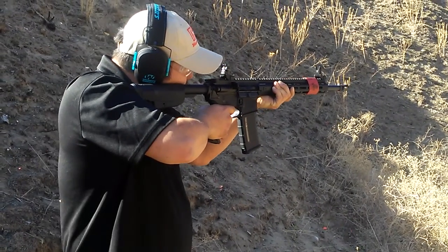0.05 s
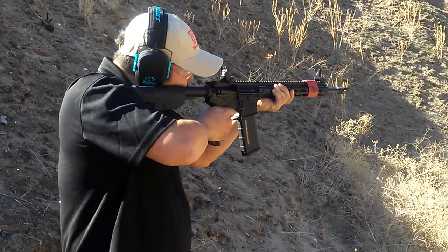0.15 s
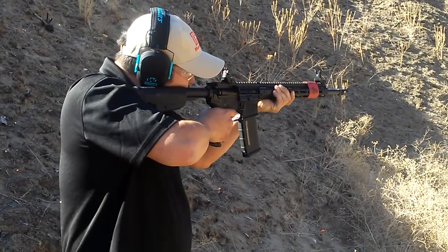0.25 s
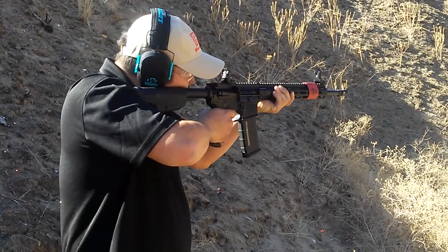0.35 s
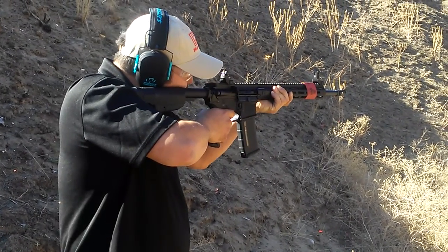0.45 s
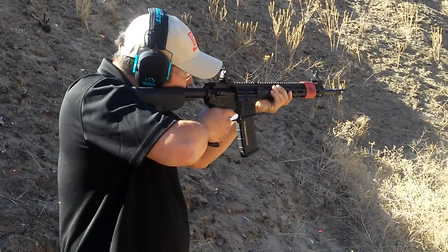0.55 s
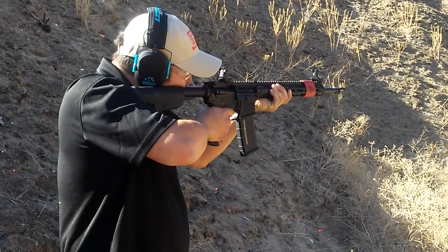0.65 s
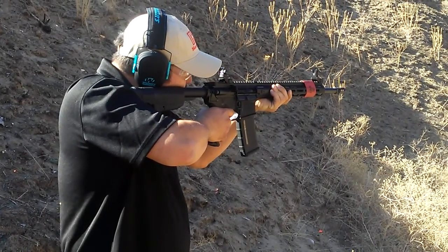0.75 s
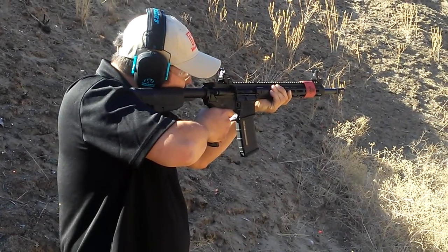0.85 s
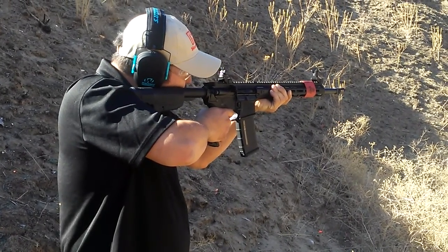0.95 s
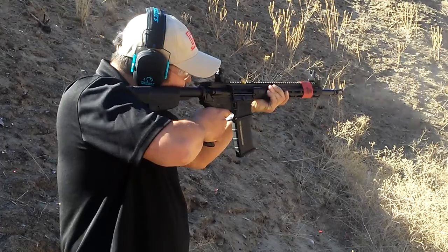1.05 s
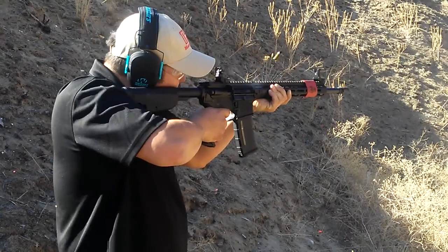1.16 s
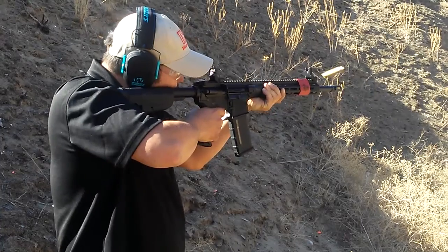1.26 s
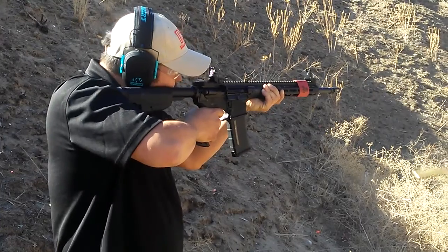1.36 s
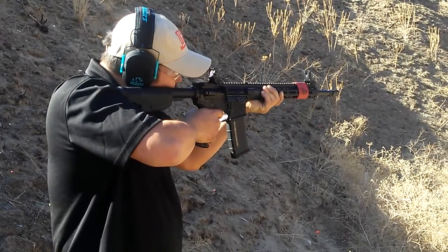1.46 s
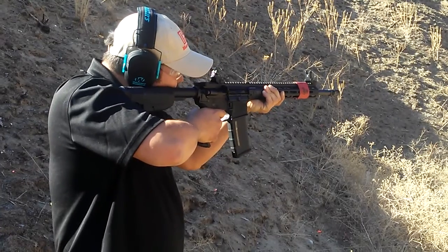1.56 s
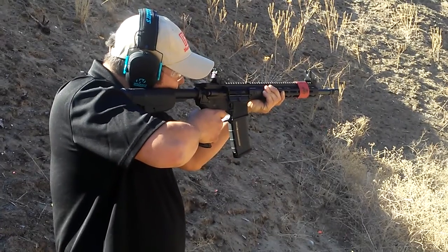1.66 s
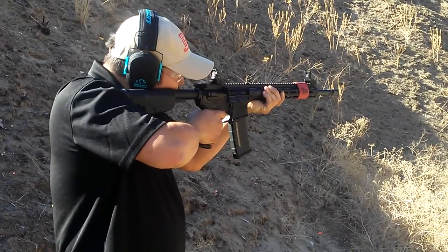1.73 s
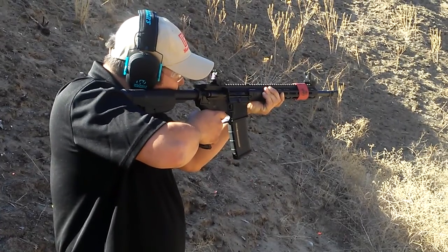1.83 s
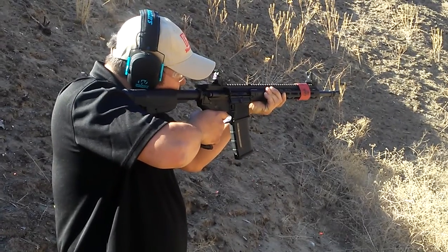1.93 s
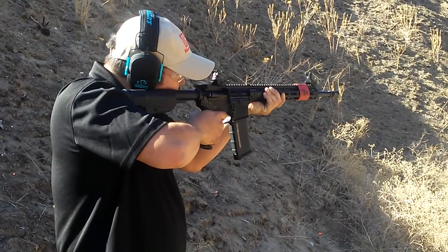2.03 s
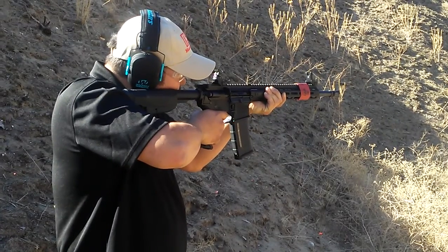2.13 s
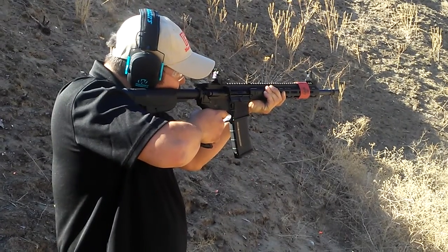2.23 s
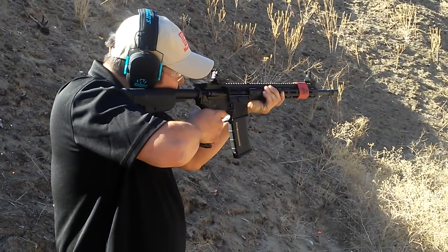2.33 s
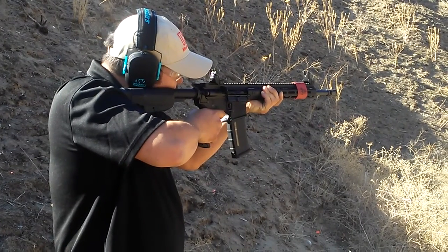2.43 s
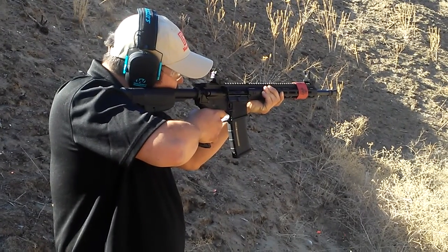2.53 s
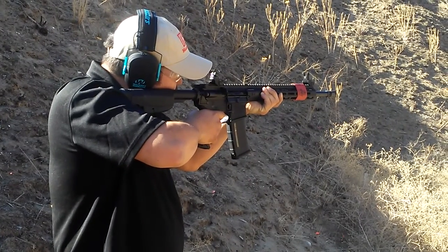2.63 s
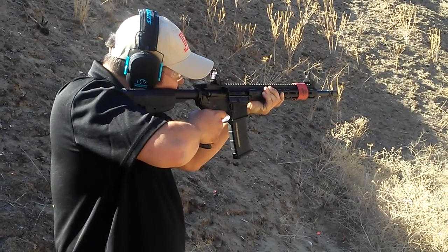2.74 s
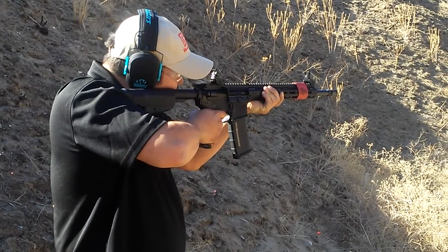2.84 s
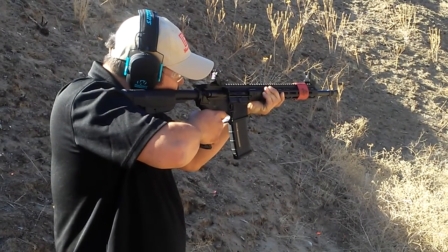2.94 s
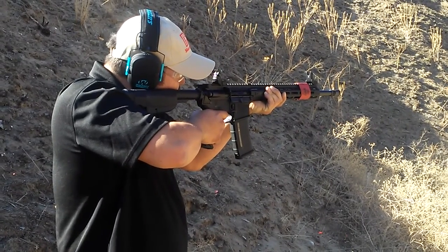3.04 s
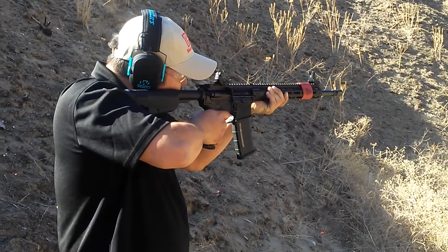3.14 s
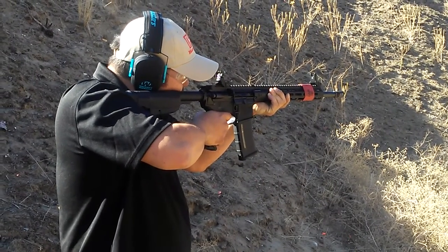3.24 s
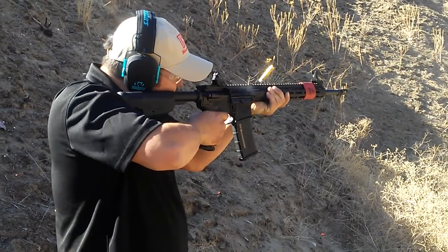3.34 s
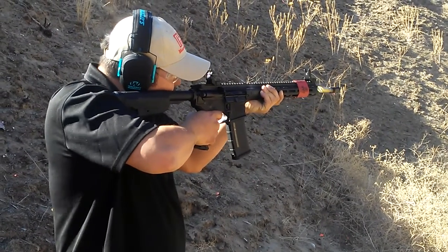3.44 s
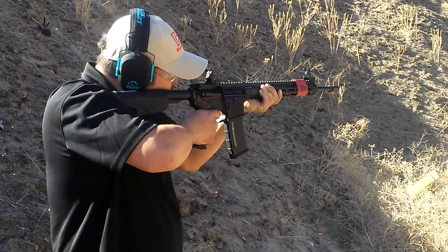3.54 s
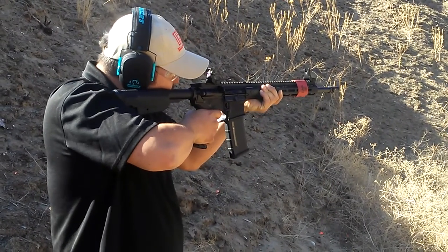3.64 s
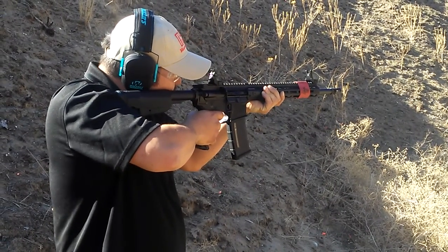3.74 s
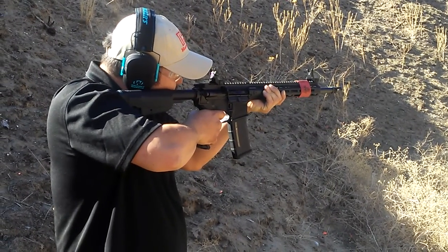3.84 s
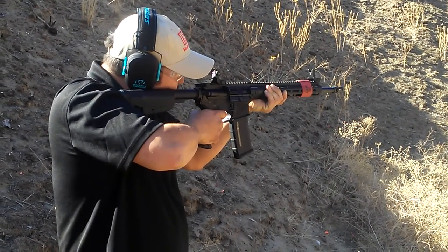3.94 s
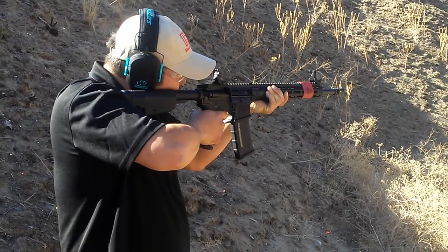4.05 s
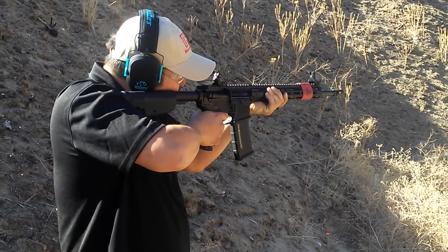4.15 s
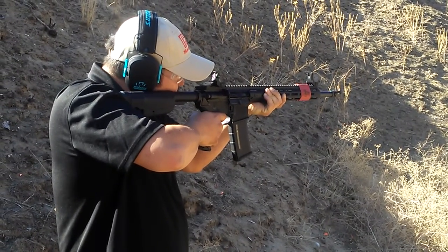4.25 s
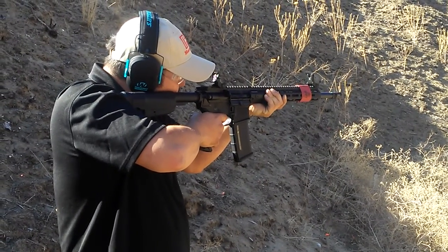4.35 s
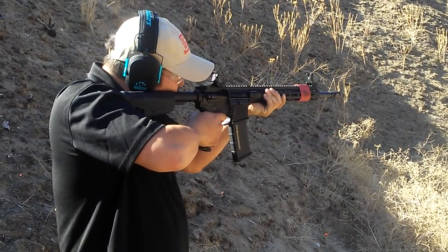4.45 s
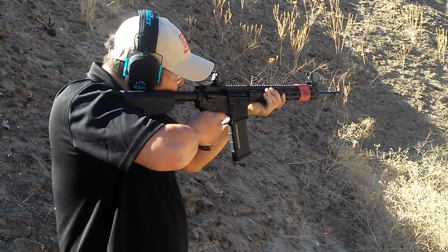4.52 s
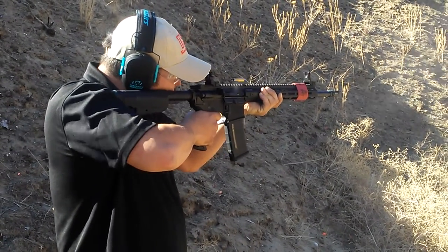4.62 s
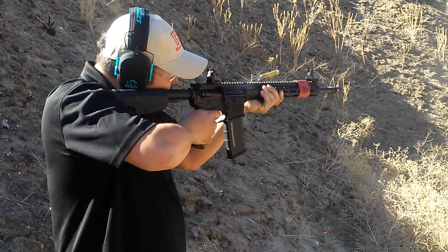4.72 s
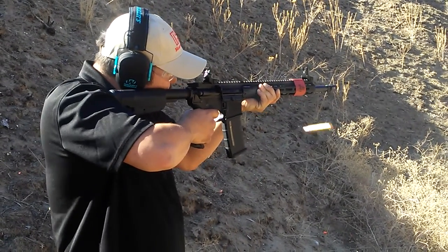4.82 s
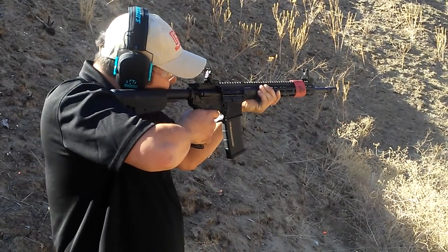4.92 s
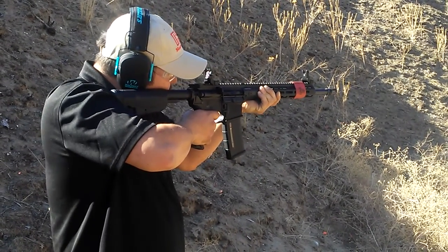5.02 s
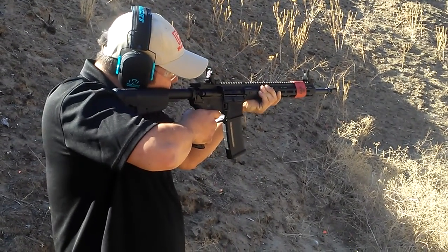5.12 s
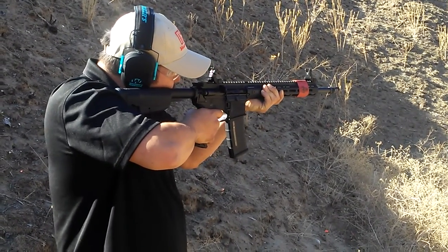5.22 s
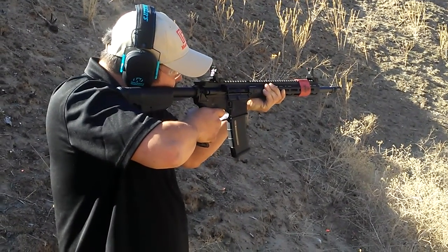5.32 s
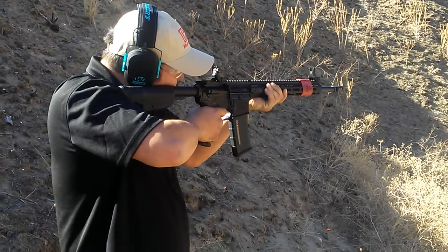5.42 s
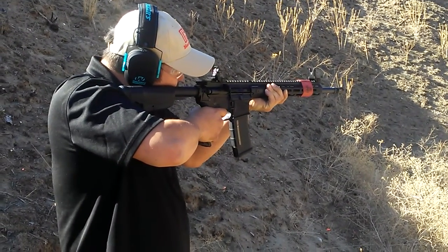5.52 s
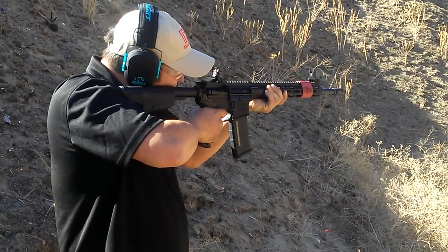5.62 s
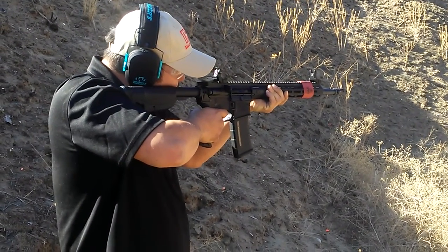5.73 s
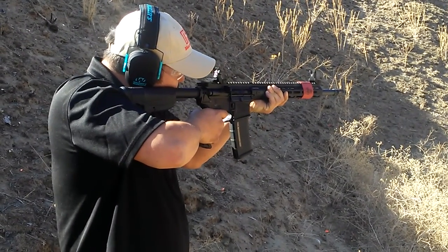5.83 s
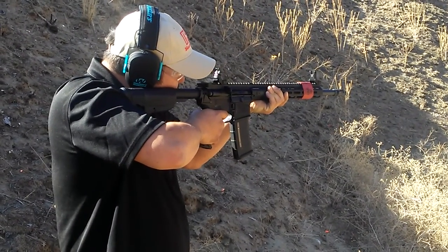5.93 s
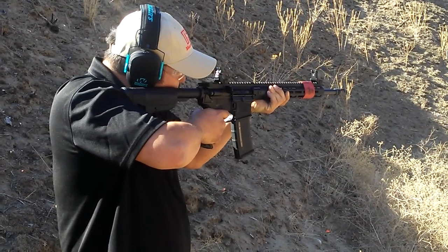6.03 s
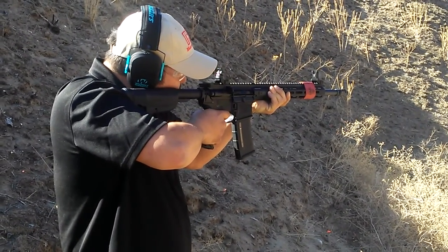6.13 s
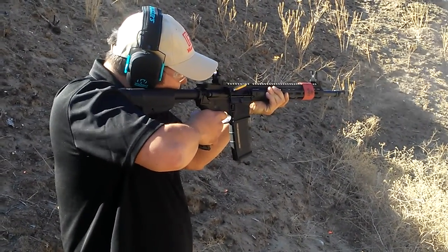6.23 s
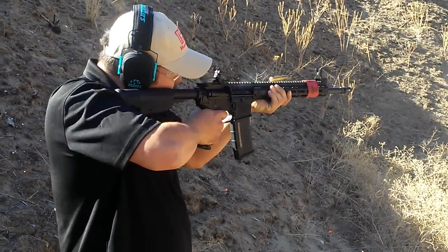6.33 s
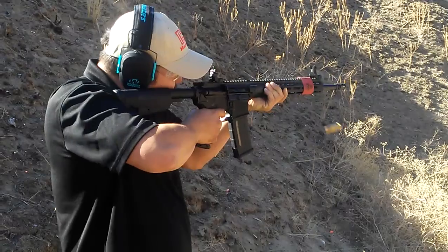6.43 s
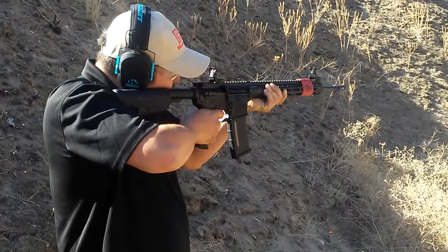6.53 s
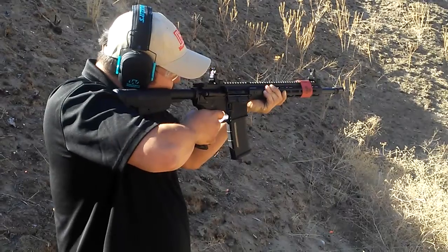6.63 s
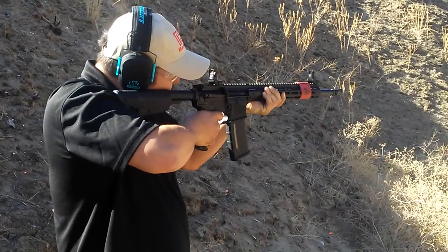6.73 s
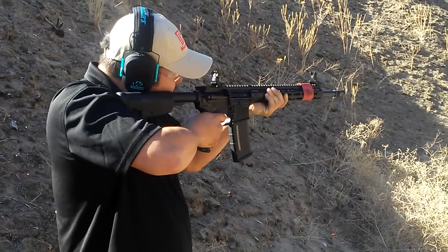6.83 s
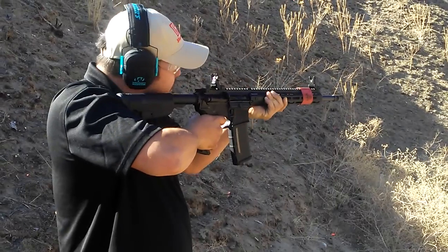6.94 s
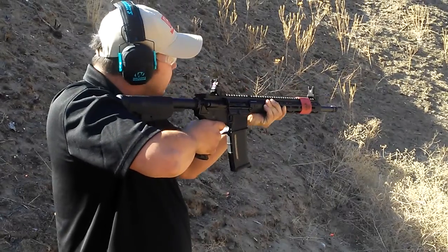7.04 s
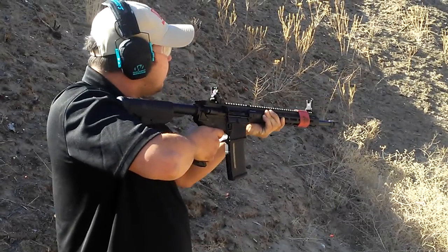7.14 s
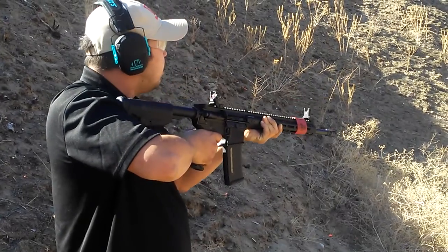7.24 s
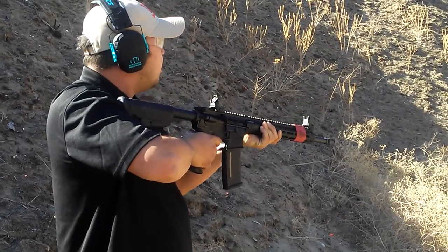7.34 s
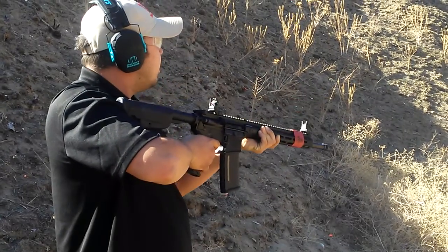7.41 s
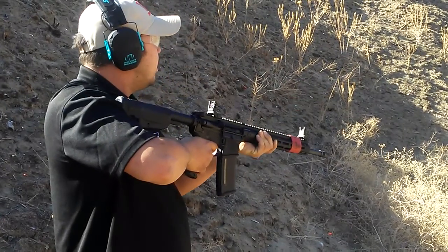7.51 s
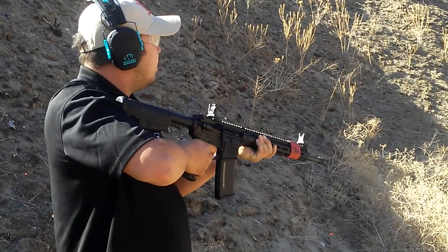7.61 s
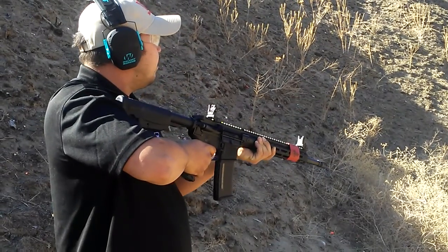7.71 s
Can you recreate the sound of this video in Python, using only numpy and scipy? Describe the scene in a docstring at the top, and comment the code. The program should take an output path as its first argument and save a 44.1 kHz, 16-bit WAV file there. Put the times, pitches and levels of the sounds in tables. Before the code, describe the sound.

A semi-automatic rifle fires four single shots close to the microphone on an outdoor range, about one and a half to two seconds apart. Each sharp, slightly overloaded blast rolls off earth banks and returns faintly from distant hills. Spent brass cases tick and ring softly after the first two shots, wind briefly bumps the microphone, and the trigger clicks. A sleeve brushes faintly against the rifle at the end.

```python
"""On an outdoor range, a semi-automatic rifle fires four single shots close to the microphone.
Each blast overloads the input, rolls round the earth banks with nearly the same echoes every time,
and comes back from far hills a second later. The trigger resets, spent brass cases land and ring,
gusts bump the microphone and a sleeve brushes the rifle. A soft gate turns down the pauses."""
import sys
import numpy as np
from scipy import signal
from scipy.fft import rfft, irfft, next_fast_len
from scipy.io import wavfile
from scipy.ndimage import uniform_filter1d, map_coordinates

SR = 44100
rng = np.random.default_rng(int(sys.argv[2]) if len(sys.argv) > 2 else 0)


def digitize_waveform(pressure):
    """Quantize a signal to 16-bit integers and store it at the path in sys.argv[1].

    Rows of a 2-D input are taken as channels; values are limited to [-1, 1].
    """
    field = np.atleast_2d(pressure).T
    bounded = np.clip(field, -1, 1)
    quanta = np.round(bounded * 32767).astype(np.int16)
    wavfile.write(sys.argv[1], SR, quanta)


N = 342651
NOW = np.arange(N) / SR  # seconds since the scene began
AGE = np.arange(int(1.2 * SR)) / SR  # seconds since a shot
BRIEF = AGE[:SR // 4]  # the same clock for short sounds

# the shots: (time [s], blast level [dB], gas push [dB], lead-in crack [dB], echo from the hills [dB])
SHOTS = [(1.1135, -0.5, 2, -23.5, -40), (3.3336, -0.5, -2.5, -23, -39), (4.6526, 0, -5.5, -13, -39.5),
         (6.2743, 0.5, -5.5, -14, -39)]


def amp(db):
    """Turn decibels into a factor to multiply by."""
    return 10 ** (np.asarray(db) / 20)


def unit(x):
    """Scale a signal to an average strength (rms) of 1."""
    return x / np.sqrt(np.mean(x ** 2) + 1e-20)


def colour(points):
    """A tone curve drawn through points of (frequency [Hz], relative level [dB])."""
    point_hz, db = np.transpose(points)
    return lambda hz: amp(np.interp(np.log(hz + 1), np.log(point_hz), db))


def band(centre_hz, q):
    """A tone curve with one broad hump; a higher q makes it narrower."""
    return lambda hz: 1 / np.sqrt(1 + (q * (hz / centre_hz - centre_hz / (hz + 1))) ** 2)


def filtered(x, curve):
    """Shape a sound with a tone curve."""
    n = x.shape[-1]
    padded = next_fast_len(n + 8192)
    return irfft(rfft(x, padded) * curve(np.fft.rfftfreq(padded, 1 / SR)), padded)[..., :n]


def noise(curve, size):
    """Noise of strength 1, shaped by a tone curve."""
    return unit(filtered(rng.standard_normal(size), curve))


def wobble(clock, per_s):
    """A smooth curve through per_s random values a second."""
    return map_coordinates(rng.standard_normal(SR // 10), [clock * per_s])


def add(track, s, sound):
    """Mix a sound into the track, starting at s seconds."""
    part = track[round(s * SR):][:len(sound)]
    part += sound[:len(part)]


def envelope(db, rise_s, sag_db_per_s, hold_s, drop_db_per_s):
    """Loudness after a shot: it rises, sags steadily, and drops faster once the hold is over."""
    rise = 1 - np.exp(-AGE / rise_s)
    return rise * amp(db - sag_db_per_s * AGE - drop_db_per_s * np.maximum(AGE - hold_s, 0))


def scatter(curve, change):
    """One row of noise per shot: the ground stays put, so all share a pattern, plus some change."""
    shared = rng.standard_normal(len(AGE))
    fresh = rng.standard_normal((len(SHOTS), len(AGE)))
    return unit(filtered(shared + change * fresh, curve))


def distance():
    """Far hills send back each shot as a dull wash and boom, over rumbling air and a faint hiss."""
    # tone of the wash from the hills: (frequency [Hz], relative level [dB])
    wash_tone = [(40, -37), (120, -14.5), (230, 0), (350, 2.5), (490, -1), (690, 4.5), (880, -7),
                 (1250, -1.5), (1500, -7.5), (1850, -8), (2300, -14.5), (2900, -32), (4300, -34.5),
                 (9000, -57.5)]
    # tone of their boom and of the air: (frequency [Hz], relative level [dB])
    rumble_tone = [(10, -34.5), (30, -17), (52, 3), (100, -8), (200, -18), (400, -34), (3000, -82.5)]
    hiss_tone = [(100, -2.2), (1000, 0.35), (4000, 3), (7000, -2.0), (15000, -0.5)]
    earlier_shot = (-1.437, -42.5)  # fired before the scene opens: (time [s], echo level [dB])
    full_at_s, fade_from_s = 1.133, 1.273
    swell_db_per_s, fade_db_per_s = 29, 43.5
    echo = np.zeros(N)
    for s, *_, hills_db in [earlier_shot] + SHOTS:
        age = NOW - s
        swell_db = swell_db_per_s * np.minimum(age - full_at_s, 0)
        fade_db = fade_db_per_s * np.maximum(age - fade_from_s, 0)
        echo += (age > 0) * amp(hills_db + swell_db - fade_db)
    wash = noise(colour(wash_tone), N)
    boom = amp(-11.5) * noise(colour(rumble_tone), N)
    hiss = amp(-66) * noise(colour(hiss_tone), N)
    rumble = amp(-59.5 + 0.5 * wobble(NOW, per_s=7.2)) * noise(colour(rumble_tone), N)
    return echo * (wash + boom) + rumble + hiss


def wind():
    """Gusts shed ever weaker, slower swirls; each rocks the microphone about once and stirs the air."""
    # gusts on the microphone: (time [s], length [s], level [dB], swirl pitch [Hz])
    gusts = [(.19, .02, -41, 64.6), (0.226, .09, -39.5, 61), (0.683, .02, -47, 70), (2.183, .02, -32, 71),
             (2.253, .2, -12, 115), (2.495, .02, -30.5, 109), (2.725, .09, -27, 85.5),
             (2.841, .05, -43, 65), (2.993, 0.16, -29.5, 100), (3.321, .02, -34.5, 89.4),
             (5.627, .05, -29, 62), (6.259, .02, -30, 85.6)]
    stir_tone = [(15, -34), (50, 22.5), (130, -1), (230, -3.0), (400, -9.5), (1000, -62), (3000, -100)]
    gap_s, jitter_s, lead_s = 0.035, 0.004, 0.1  # lead_s leaves room for a swirl to build up
    fade_db_per_s, slowing_octaves_per_s, spread_octaves = 42, 2.6, 0.25
    bumps, stir = np.zeros(N), np.zeros(N)
    for (s, length, db, hz), chance in zip(gusts, rng.standard_normal((len(gusts), 20, 2))):
        for age, (late, sharp) in zip(np.arange(0, length, gap_s), chance):
            start = s + age + jitter_s * late - lead_s
            size = amp(db - fade_db_per_s * age)
            octaves = spread_octaves * sharp - slowing_octaves_per_s * age
            cycles = (BRIEF - lead_s) * hz * 2 ** octaves
            add(bumps, start, size * np.sin(2 * np.pi * cycles) * np.exp(-(cycles / 0.68) ** 2))
            add(stir, start, size * np.exp(-(cycles / 3.0) ** 2))
    return bumps + amp(-16) * stir * noise(colour(stir_tone), N)


def sleeve():
    """A sleeve hisses softly as it slides over the stock while the rifle is lowered."""
    # strokes of the sleeve: (time [s], level [dB], half length [s])
    swishes = [(7.134, -41.5, 0.045), (7.292, -41.5, 0.12), (7.44, -47.5, 0.069)]
    # tone of rubbing cloth: (frequency [Hz], relative level [dB])
    cloth_tone = [(200, -29), (700, 14.5), (1500, 15.5), (2200, 12), (2900, -7.5), (4000, -4.5),
                  (5200, -17), (7000, -34), (12000, -40)]
    slide = sum(amp(db) * np.exp(-((NOW - s) / half_s) ** 2) for s, db, half_s in swishes)
    return slide * noise(colour(cloth_tone), N)


def cases():
    """Spent brass cases tick on the stones and ring very high."""
    # cases touching down: (time [s], tick level [dB], ring level [dB])
    landings = [(1.831, -48, -74), (1.859, -40, -61), (1.873, -38, -51), (1.881, -42, -77),
                (4.033, -45.5, -56), (4.199, -36.5, -61), (4.213, -38, -66)]
    # notes of a case: (pitch [Hz], relative level [dB], time to fade by 60 dB [s])
    brass_notes = [(12480, 1, .13), (15670, -3, .18)]
    stone_tone = [(200, -24), (2000, 9.5), (3800, 2), (6500, -2), (9000, -27), (15000, -18)]
    out = np.zeros(N)
    for s, tick_db, ring_db in landings:
        ring = sum(amp(db + rng.normal(0, 1.8) - 60 * BRIEF / fade_s) * np.sin(2 * np.pi * hz * BRIEF)
                   for hz, db, fade_s in brass_notes)
        tick = amp(-60 * BRIEF / 0.043) * noise(colour(stone_tone), len(BRIEF))
        add(out, s, amp(tick_db) * tick + amp(ring_db) * ring)
    return out


def knocks():
    """Each knock is a quickly fading thud under a short click, both softened by the air on their way."""
    # the trigger resetting, things hitting the ground and knocks on the microphone:
    # (time [s], thud level [dB], thud pitch [Hz], time for the thud to fade by 60 dB [s], click [dB])
    hits = [(1.834, -19, 263, 0.043, -32.5), (2.251, -6, 210, 0.022, -48), (3.675, -1.5, 855, 0.016, -18),
            (4.032, -25.5, 305, 0.059, -38.5), (4.198, -23, 1080, 0.04, -25), (4.213, -39, 1500, .025, -22),
            (4.229, -44, 1000, .03, -31.5), (5.338, -18.5, 253, 0.035, -40),
            (6.6351, -6, 1190, 0.0069, -10), (6.946, -5, 266, 0.011, -29.5),
            (7.251, -27.5, 270, 0.037, -52)]
    click_tone = [(40, -31), (150, 11), (1100, 10.5), (2000, 6.0), (2800, -1), (4000, -9.0),
                  (7000, -36), (15000, -41)]
    out = np.zeros(N)
    for s, db, hz, fade_s, click_db in hits:
        rise = 1 - np.exp(-3 * hz * BRIEF)
        thud = rise * amp(db - 60 * BRIEF / fade_s) * np.sin(2 * np.pi * hz * BRIEF)
        click = amp(click_db - 60 * BRIEF / 0.037) * noise(colour(click_tone), len(BRIEF))
        add(out, s, thud + click)
    return filtered(out, lambda hz: 1 / (1 + (hz / 6000) ** 4))


def burst(curve, rise_s, decay_s):
    """A very short burst of noise."""
    return noise(curve, len(BRIEF)) * (1 - np.exp(-BRIEF / rise_s)) * np.exp(-BRIEF / decay_s)


def lead_in_and_bolt():
    """A short, faint crack leads into each blast; then the bolt slams shut and its spring sizzles."""
    # tone of the recoil spring: (frequency [Hz], relative level [dB])
    spring_tone = [(3000, -30), (6500, 4), (8800, 7), (11500, -7), (13700, -7), (16000, -11)]
    lead_in_tone = [(40, -33.0), (200, -7), (1200, -4.0), (2300, 1.0), (3500, -5), (5200, -5.5),
                    (7500, -26.0), (15000, -32.5)]
    spring_db, spring_fade_s = -46.5, 0.47
    out = np.zeros(N)
    for s, _, _, lead_in_db, _ in SHOTS:
        lead_in = burst(colour(lead_in_tone), rise_s=0.001, decay_s=0.003)
        bolt = burst(band(4800, q=1.3), rise_s=0.0005, decay_s=0.0036)
        spring = noise(colour(spring_tone), len(AGE)) * amp(spring_db - 60 * AGE / spring_fade_s)
        add(out, s - 0.0075, amp(lead_in_db) * lead_in)
        add(out, s + 0.083, amp(-13) * bolt)
        add(out, s + 0.15, spring)
    return out


def slaps():
    """Separate echoes of each shot: air and soft soil swallow the treble; the deepest bass is lost."""
    # echoes round the range: (delay [s], level [dB], rise [s], decay [s], centre pitch [Hz])
    echoes = [(.02, -2.5, 0.0066, 0.0092, 130), (.058, -7.5, 0.0017, .012, 1462),
              (0.102, -9, .02, .02, 795), (0.162, -13.5, 0.0038, 0.03, 102.2),
              (0.197, -15.5, 0.012, 0.025, 106), (0.207, -15, 0.00074, 0.037, 1100),
              (.255, -21, 0.0048, 0.13, 1420), (0.347, -17.5, 0.003, 0.022, 393),
              (.402, -14, .0005, 0.0084, 1100), (.478, -18.5, 0.0023, 0.024, 790),
              (0.57, -20, 0.011, 0.025, 360), (.69, -37, 0.0082, 0.052, 254)]
    out = np.zeros((len(SHOTS), len(AGE)))
    for delay, db, rise, decay, centre_hz in echoes:
        def dulled(hz):
            treble_loss = (1 + (hz / (4 * centre_hz)) ** 2) * (1 + (hz / 2500) ** 8)
            bass_loss = 1 + (58 / (hz + 1)) ** 4
            return band(centre_hz, q=0.9)(hz) / (treble_loss * bass_loss)
        swell = np.exp(-np.maximum((delay - AGE) / rise, (AGE - delay) / decay))
        out += amp(db) * swell * scatter(dulled, change=0.17)
    return out


def lumps(per_s, depth_db):
    """A random flutter in loudness: rocks and gullies throw sound back in clumps."""
    return unit(amp(depth_db * wobble(AGE, per_s)))


def banks():
    """The roll of each shot: a low boom and a fuller body off the earth, a sizzle off dry brush."""
    # tones of the boom, the body and the brush, each: (frequency [Hz], relative level [dB])
    boom_tone = [(12, -58.5), (30, -24.5), (48, -13.5), (85, -6.5), (130, -5), (190, -3), (280, -4),
                 (450, -27), (900, -70), (3000, -120)]
    body_tone = [(30, -59.5), (100, -32.5), (190, -9.5), (300, -2), (400, -2), (500, -3), (660, 0.5),
                 (900, -5.5), (1100, -8.5), (1350, -6), (2100, -11), (2550, -19), (3500, -25),
                 (7000, -74.5)]
    brush_tone = [(300, -52.5), (1200, -34), (2300, -7.5), (2900, -0.5), (4000, 2.5), (5000, -3),
                  (6000, -15), (7300, -36.5), (8800, -39), (11000, -44), (13500, -42.5), (16000, -47)]
    # pitches that the banks boost or weaken: (pitch [Hz], width [Hz], boost [dB])
    bank_pitches = [(182, 9.7, 9), (268, 48, 1), (306, 170, 5.5), (366, 17, -5), (457, 14, 4),
                    (564, 26, -1), (747, 22, -2), (765, 11, 4), (1030, 20, -5), (1280, 73, 1),
                    (1920, 8, 6.5)]

    def body_curve(hz):
        boost_db = sum(db / (1 + (2 * (hz - pitch) / width) ** 2) for pitch, width, db in bank_pitches)
        return colour(body_tone)(hz) * amp(boost_db)

    # the near banks answer at once and loudly
    boom = envelope(db=-8, rise_s=0.13, sag_db_per_s=32, hold_s=0.07, drop_db_per_s=451.5)
    body = envelope(db=-1.5, rise_s=0.008, sag_db_per_s=72, hold_s=0.22, drop_db_per_s=403)
    brush = envelope(db=-5.5, rise_s=0.004, sag_db_per_s=191.5, hold_s=0.078, drop_db_per_s=301)
    # the long sides answer more softly, until the sound has reached the far end
    boom += envelope(db=-21.5, rise_s=0.03, sag_db_per_s=19.5, hold_s=0.51, drop_db_per_s=24.5)
    body += envelope(db=-15, rise_s=0.03, sag_db_per_s=22.5, hold_s=0.6, drop_db_per_s=224)
    brush += envelope(db=-6.5, rise_s=0.2, sag_db_per_s=70.5, hold_s=0.58, drop_db_per_s=220)
    brush += amp(-48.5 - 25.5 * AGE)  # brush beyond the range keeps whispering
    roll = boom * scatter(colour(boom_tone), change=0.16)
    roll += body * scatter(body_curve, change=0.45) * lumps(per_s=170, depth_db=0.6)
    roll += brush * scatter(colour(brush_tone), change=0.9) * lumps(per_s=220, depth_db=2.0)
    return roll


def muzzle_blasts():
    """Each shot is a brief crack and its wake, with one slow push of gas and the range's echoes."""
    # tone of the blast: (frequency [Hz], relative level [dB])
    blast_tone = [(25, -37), (100, -10.5), (300, -4.5), (600, 3), (1200, -6), (1950, 1.5), (2800, -10),
                  (4300, -22.5), (6000, -16), (8000, -25), (15000, -30)]
    crack = envelope(db=8.5, rise_s=0.00075, sag_db_per_s=21.5, hold_s=0.011, drop_db_per_s=1696)
    wake = envelope(db=-2.5, rise_s=0.003, sag_db_per_s=190.5, hold_s=0.07, drop_db_per_s=167.5)
    direct = (crack + wake) * scatter(colour(blast_tone), change=0.46)
    blasts = direct + banks() + slaps()
    push_hz, from_middle_s = 64, AGE - 0.0225
    push = -np.sin(2 * np.pi * push_hz * from_middle_s) * np.exp(-(from_middle_s / 0.017) ** 2)
    out = np.zeros(N)
    for (s, db, push_db, _, _), blast in zip(SHOTS, blasts):
        add(out, s, amp(db) * blast + amp(push_db) * push)
    return out


def scene():
    """Everything reaches one microphone."""
    rifle = muzzle_blasts() + lead_in_and_bolt()
    return (rifle + knocks() + cases() + wind() + sleeve() + distance())[None]


def gate(x):
    """A soft noise gate: it turns the sound down while the middle pitches are quiet."""
    threshold_db, softness_db, depth_db, window_s = -64, 2.5, 8, 0.04
    mids = signal.sosfilt(signal.butter(3, [300, 2500], "band", fs=SR, output="sos"), x)
    power = np.abs(uniform_filter1d(mids ** 2, round(window_s * SR)))
    level_db = 10 * np.log10(power + 1e-12)
    shut = 0.5 - 0.5 * np.tanh((level_db - threshold_db) / softness_db)
    return x * amp(-depth_db * shut)


def record(dry):
    """The input cuts the deepest bass, flattens loud peaks, lowers the pauses and cuts the top treble."""
    ceiling, hardness, bass_hz, top_hz = 0.99, 9, 24, 15750
    trimmed = signal.sosfilt(signal.butter(2, bass_hz, "high", fs=SR, output="sos"), dry)
    clipped = trimmed / (1 + np.abs(trimmed / ceiling) ** hardness) ** (1 / hardness)
    return signal.sosfilt(signal.ellip(10, 0.1, 75, top_hz, fs=SR, output="sos"), gate(clipped))


dry = scene()
out = record(dry)
digitize_waveform(out)
```